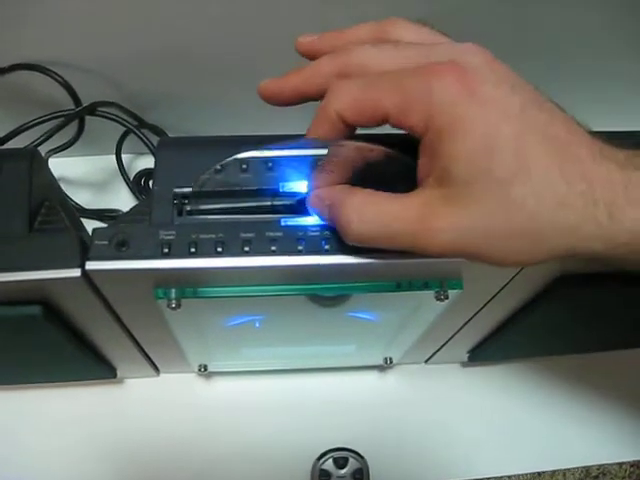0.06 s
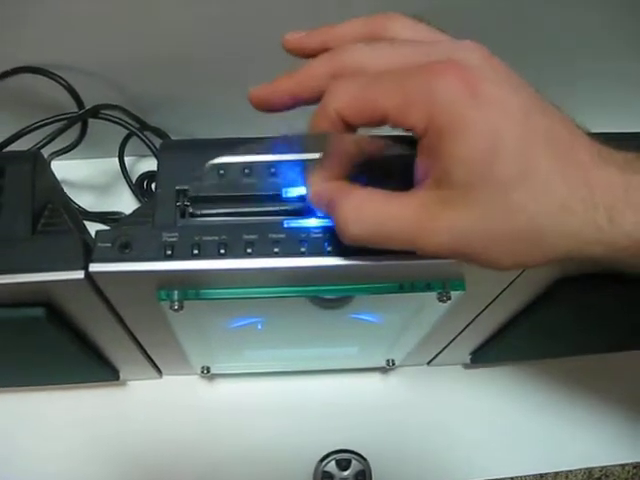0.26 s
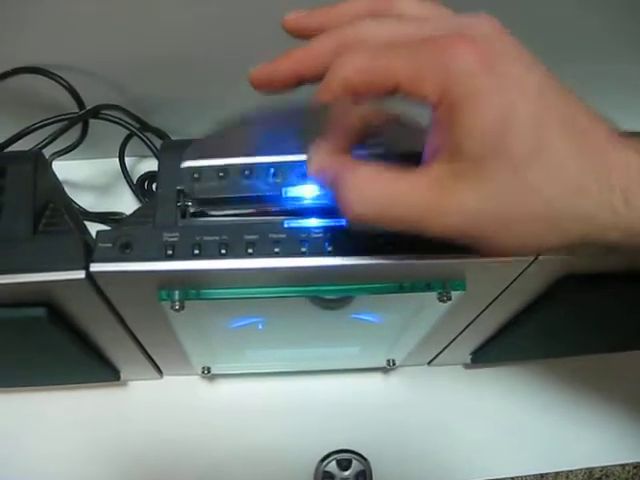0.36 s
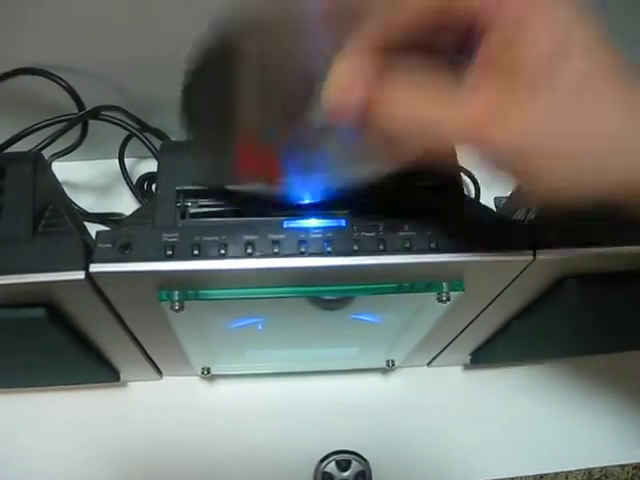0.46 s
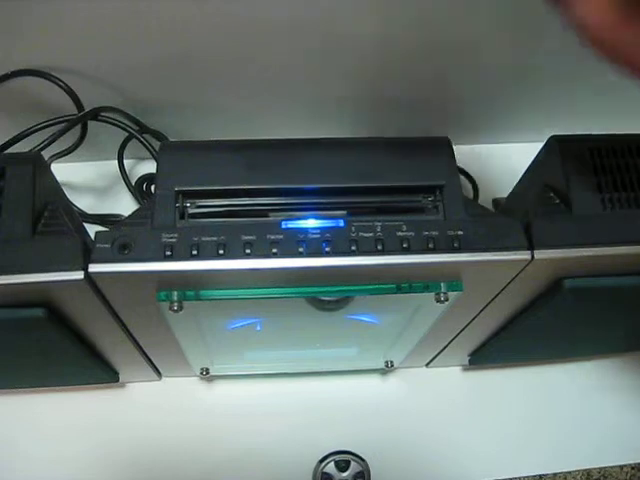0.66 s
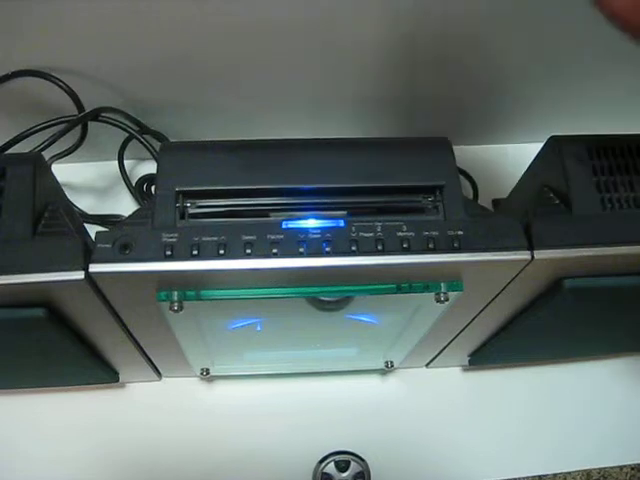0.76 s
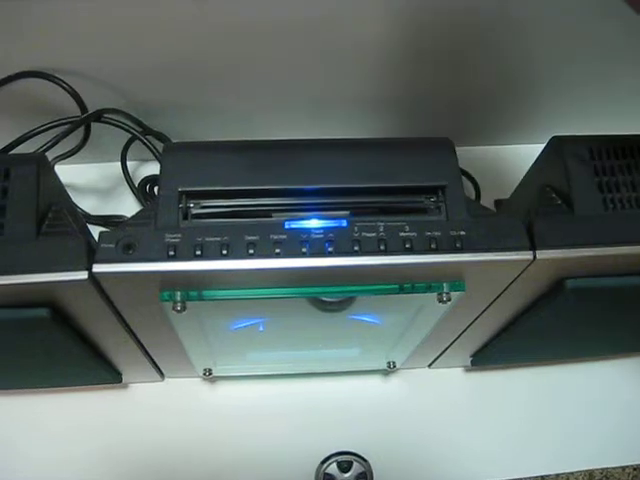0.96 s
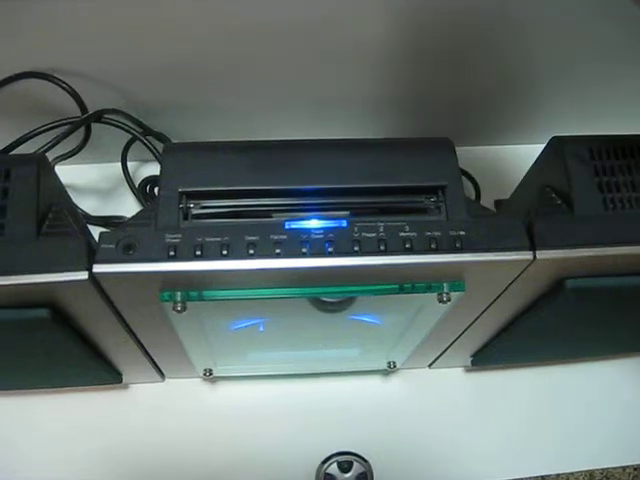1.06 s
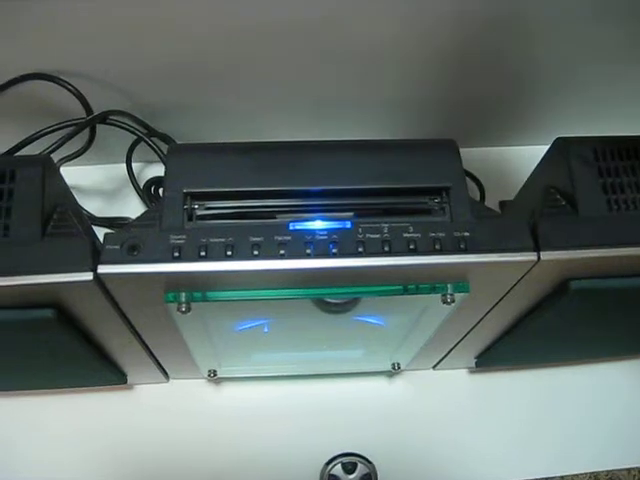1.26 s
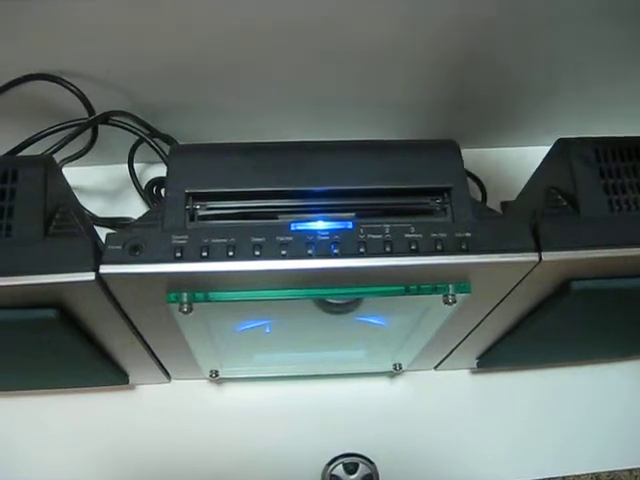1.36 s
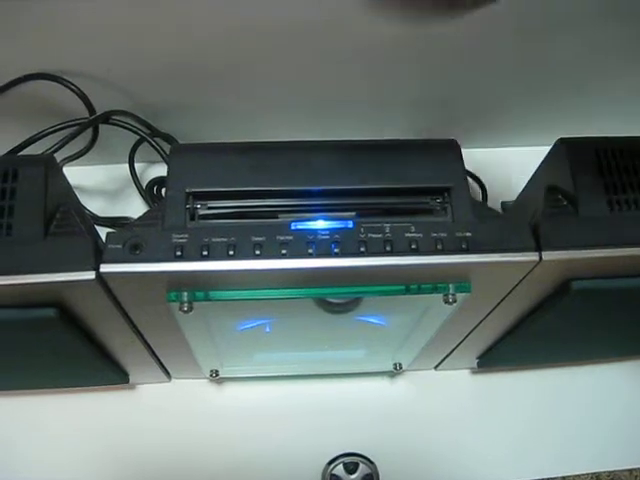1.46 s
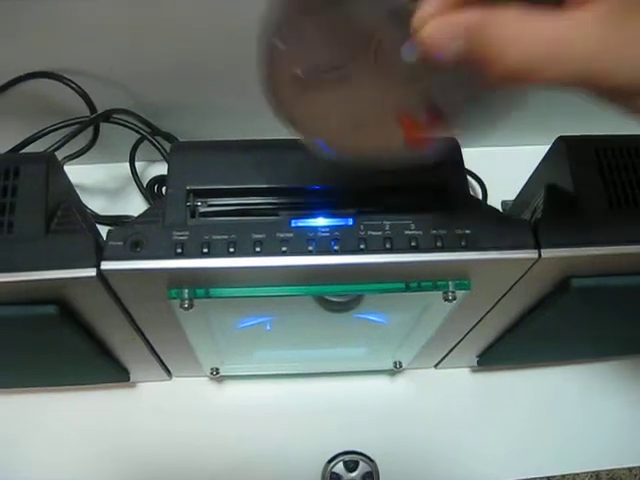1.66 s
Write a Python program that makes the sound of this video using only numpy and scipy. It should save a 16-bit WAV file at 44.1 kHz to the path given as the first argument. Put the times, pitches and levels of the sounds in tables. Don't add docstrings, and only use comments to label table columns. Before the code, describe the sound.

A disc snaps out of a plastic player slot, rattles briefly and scrapes free in a quiet room.

```python
import sys
import numpy as np
from scipy import signal
from scipy.fft import rfft, irfft
from scipy.io import wavfile
from scipy.ndimage import uniform_filter1d

SR = 44100
rng = np.random.default_rng(int(sys.argv[2]) if len(sys.argv) > 2 else 0)


def linear_from_db(decibels):
    return 10 ** (np.asarray(decibels, float) / 20)


def file_out(sig):
    cols = np.atleast_2d(sig).T
    lim = np.clip(cols, -1, 1)
    pcm = np.round(lim * 32767).astype(np.int16)
    wavfile.write(sys.argv[1], SR, pcm)


N = 74970
NOTCH_HZ = 7870


def evened(x):
    return x / np.sqrt(np.mean(x ** 2) + 1e-20)


def read(points, hz):
    point_hz, value = np.transpose(points)
    return np.interp(np.log(hz + 1), np.log(point_hz + 1), value)


def add(mix, start_s, sound):
    part = mix[round(start_s * SR):][:len(sound)]
    part += sound[:len(part)]


def lumps(length_s):
    return evened(uniform_filter1d(rng.standard_normal(N), int(length_s * SR)))


def resonate(x, hz, width_hz):
    r = np.exp(-np.pi * width_hz / SR)
    return 2 * signal.lfilter([1 - r], [1, -r * np.exp(2j * np.pi * hz / SR)], x).real


def ring(drive, hz, width_hz):
    out = resonate(drive, hz, width_hz)
    return 1.8 * out / np.linalg.norm(out)


def rattle(t, length_s):
    contacts_per_s = 6000
    draw = rng.random((2, len(t)))
    contacts = (draw[0] < contacts_per_s / SR) * (2 * draw[1] - 1)
    contacts[0] = 1
    contacts = contacts * linear_from_db(-8 * (t / length_s) ** 5.6)
    return contacts / np.linalg.norm(contacts)


# [pitch_hz, density_db (per Hz)]
HISS_SPECTRUM = [(20, -9.5), (110, -1), (400, -5.5), (1000, -10.5), (2500, -15.5), (6500, -21),
                 (12000, -24.5), (16000, -31)]


def hiss():
    level_db, lump_db, lump_hz, lump_s = -54, 2, 650, .012
    hz = np.fft.rfftfreq(N, 1 / SR)
    spectrum = rfft(rng.standard_normal(N)) * linear_from_db(read(HISS_SPECTRUM, hz))
    low = 1 / np.sqrt(1 + (hz / lump_hz) ** 2)
    murmur = irfft(spectrum * low, N) * evened(linear_from_db(lump_db * lumps(lump_s)))
    return linear_from_db(level_db) * evened(murmur + irfft(spectrum * (1 - low), N))


# [pitch_hz, width_hz, level_db]
DISC_MODES = [(1214, 200, 2), (1740, 300, 9.5), (2200, 505, 9), (2690, 133, 12), (3400, 240, -0.5),
              (3990, 620, 6), (4497, 440, 5), (5560, 390, 5), (6220, 570, 9), (6850, 680, 6),
              (8600, 1150, 7.5), (11180, 1260, 8.5), (13400, 1700, 6), (15100, 1400, 4.5)]


def disc_ring(t, length_s, treble_db, thump_db):
    body_hz, treble_hz, sharp_s = 3000, 7800, .004
    contacts = rattle(t, length_s)
    blow = .7 * contacts + (t == 0) * min(sharp_s / length_s, 1) ** 2
    out = np.zeros(len(t))
    for k, (hz, width_hz, db) in enumerate(DISC_MODES):
        gain_db = db + treble_db * (hz > treble_hz) + thump_db * (hz < body_hz)
        drive = blow if hz < body_hz else contacts
        out += (-1) ** k * linear_from_db(gain_db) * ring(drive, hz, width_hz)
    return out


# [pitch_hz, level_db, t60_s]
CASE_MODES = [(284.4, -10.5, 0.34), (326, -4.5, 0.14), (344.7, -9, 0.37), (394, 1.5, 0.066),
              (600, -10, 0.033), (685, -7.5, 0.066), (760, 0.5, 0.097), (835, -10.5, 0.34), (926, -9.5, .1),
              (1620, -13, 0.23), (1659, -16, 0.12), (1778, -10.5, 0.13), (1904, -8, 0.09)]


def case_ring(t, start_s):
    rise_s, damp_start_s, damp_db_per_s = 0.0035, .285, 350
    modes = np.zeros(len(t))
    for k, (hz, db, t60_s) in enumerate(CASE_MODES):
        modes += (-1) ** k * linear_from_db(db - 60 * t / t60_s) * np.sin(2 * np.pi * hz * t)
    rise = np.sin(np.pi / 2 * np.minimum(t / rise_s, 1)) ** 2
    damping = linear_from_db(-damp_db_per_s * np.maximum(start_s + t - damp_start_s, 0))
    return rise * modes * damping


# [start_s, level_db, rattle_s, treble_db (above notch), thump_db (low modes, case)]
DISC_KNOCKS = [
    (.1996, -9.5, 0.0021, 0, -1.5),
    (.2031, -26.5, .004, 0, 1.5),
    (.2152, -17.5, 0.0046, -3.5, -5),
    (.2190, -25, 0.0015, -24, -2),
    (0.2258, -26.5, 0.0028, -4, 0.5),
    (0.2277, -23, 0.00088, -8, -2.5),
    (0.2307, -32, 0.0028, -6, 0),
    (.2337, -24.5, 0.0052, -11.5, -2),
    (0.238, -32.5, 0.0057, -13, 2),
    (.2640, -39, 0.018, -15, 8),
]


def knocks(hits, case):
    case_db, shove_db, shove_s = -14, -34, 0.0035
    t = np.arange(int(.4 * SR)) / SR
    for start_s, level_db, rattle_s, treble_db, thump_db in DISC_KNOCKS:
        add(hits, start_s, linear_from_db(level_db) * disc_ring(t, rattle_s, treble_db, thump_db))
        add(case, start_s, linear_from_db(level_db + case_db + thump_db) * case_ring(t, start_s))
    add(case, DISC_KNOCKS[0][0], linear_from_db(shove_db) * np.hanning(int(shove_s * SR)))


# [pitch_hz, t60_s]
ROOM_DECAY = [(250, 0.74), (1000, 0.48), (3000, 0.21), (8000, 0.12), (15000, 0.054)]


def room(x):
    level_db = -14.5
    taps = np.zeros(SR // 2)
    at = np.arange(100, len(taps) - 20, 20)
    taps[at + rng.integers(0, 20, len(at))] = rng.choice([-1., 1.], len(at))
    hz, t, z = signal.stft(taps, SR, nperseg=256)
    decay = linear_from_db(-60 * t / read(ROOM_DECAY, hz)[:, None])
    tail = signal.istft(z * decay, SR, nperseg=256)[1]
    return linear_from_db(level_db) * signal.fftconvolve(x, tail / np.linalg.norm(tail))[:N]


# [pitch_hz, width_hz, level_db]
RUB_MODES = [(2170, 57, -4), (2820, 280, -3), (3710, 75, -0.5), (4320, 76, -9), (5060, 120, -5),
             (5800, 69, 0), (7290, 600, 3), (9400, 440, -6), (10160, 400, -1), (11300, 340, 1),
             (12900, 500, -4), (14800, 500, -20)]


def rub(treble_db):
    slips_per_s, slip_spread_db, bed_gain, wide_db, patch_db, patch_s = 2000, 4, 0.82, 2, 3.5, .012
    slips = linear_from_db(slip_spread_db * np.minimum(rng.exponential(1, N), 2))
    slips = slips * (rng.random(N) < slips_per_s / SR)
    which = rng.integers(0, len(RUB_MODES), N)
    bed = rng.standard_normal(N)
    low, high = np.zeros(N), np.zeros(N)
    for k, (hz, width_hz, db) in enumerate(RUB_MODES):
        drive = evened(slips * (which == k)) + bed_gain * bed
        mode = linear_from_db(db) * evened(resonate(drive, hz, width_hz))
        side = low if hz < NOTCH_HZ else high
        side += mode * evened(linear_from_db(patch_db * lumps(patch_s)))
    band_sos = signal.butter(2, [800, NOTCH_HZ], "band", fs=SR, output="sos")
    top_sos = signal.butter(2, NOTCH_HZ, "high", fs=SR, output="sos")
    low = evened(low) + linear_from_db(wide_db) * evened(signal.sosfilt(band_sos, bed))
    high = evened(high) + linear_from_db(wide_db + 1) * evened(signal.sosfilt(top_sos, bed))
    return evened(low) + linear_from_db(treble_db) * evened(high)


# [start_s, level_db, treble_db (share above notch)]
SLIDE_PATH = [
    (0.234, -53, -6),
    (0.248, -41.5, -4),
    (.28, -41, -9.5),
    (.308, -43.5, -8),
    (.335, -38.5, -8.5),
    (.36, -43, -8.5),
    (.392, -43.5, -6),
    (.4, -50.5, -19),
    (.42, -73, -12),
]


def slide():
    t = np.arange(N) / SR
    start_s, level_db, treble_db = np.transpose(SLIDE_PATH)
    return linear_from_db(np.interp(t, start_s, level_db, -120, -120)) * rub(np.interp(t, start_s, treble_db))


# [start_s, pitch_hz, level_db, length_s]
CATCHES = [(0.318, 3700, -46, .01), (.3305, 2820, -39, 0.0057), (.331, 5060, -41, 0.0078),
           (0.348, 2910, -44, 0.0075), (.353, 5800, -45, 0.014), (.355, 2900, -45.5, .008),
           (0.358, 10300, -50, .014), (0.362, 9200, -51, .006), (0.373, 5800, -42, .005),
           (.3784, 5800, -33.5, 0.0061), (.386, 3024, -50, 0.013), (.387, 5800, -53, 0.0081),
           (1.535, 5800, -61, .018)]


def squeaks():
    rise_s = 0.00085
    out = np.zeros(N)
    t = np.arange(1500) / SR
    for start_s, hz, level_db, length_s in CATCHES:
        shape = np.minimum(t / rise_s, 1) * linear_from_db(-12 * (t / length_s) ** 2)
        tone = np.sqrt(2) * np.sin(2 * np.pi * hz * t)
        rough = 0.54 * evened(resonate(rng.standard_normal(len(t)), hz, 300))
        add(out, start_s, linear_from_db(level_db) * shape * (tone + rough))
    return out


def brush():
    start_s, length_s, level_db, treble_db = 1.49, 0.084, -60, 1
    u = np.clip((np.arange(N) / SR - start_s) / length_s, 0, 1)
    return linear_from_db(level_db) * np.sin(np.pi * u) ** .6 * rub(treble_db)


# [start_s, level_db, rattle_s, pitch_hz, push_db]
FAINT_TICKS = [
    (1.548, -60, .002, 1900, -49),
    (1.5855, -47.5, 0.0031, 6900, -67),
    (1.6699, -47.5, 0.00065, 2700, -43),
    (1.6715, -57.5, .01, 3600, -56),
    (1.5475, -61, 0.0022, 370, -43.5),
]


def tick(level_db, rattle_s, hz, push_db):
    wide_db, width_hz, push_hz = -1.5, 350, 756
    t = np.arange(int(.05 * SR)) / SR
    contacts = rattle(t, rattle_s) * np.sqrt(rattle_s * SR)
    tone = ring(contacts, hz, width_hz) * np.sqrt(rattle_s * SR + 30) / 2
    wide = resonate(contacts, 0.35 * hz, 2 * hz)
    push = np.sin(2 * np.pi * push_hz * t) * np.exp(-2.6 * push_hz * t)
    return linear_from_db(level_db) * (tone + linear_from_db(wide_db) * wide) + 2 * linear_from_db(push_db) * push


def scene():
    floor = hiss()
    hits, case = np.zeros(N), np.zeros(N)
    knocks(hits, case)
    moving = slide() + squeaks() + brush()
    for start_s, *settings in FAINT_TICKS:
        add(hits, start_s, tick(*settings))
    return (moving + hits + case + room(hits + .5 * moving) + floor)[None]


def top_cut(x):
    return signal.sosfilt(signal.butter(12, 17080, fs=SR, output="sos"), x)


def low_pass(x, edge_hz):
    taps = signal.firwin(1023, edge_hz, window=("kaiser", 9), fs=SR)
    return signal.oaconvolve(x, taps[None], "same")


def record(dry):
    notch_width_hz, bump_hz, bump_width_hz, bump_gain = 1750, 9200, 520, 0.36
    edge_hz, leak_edge_hz, leak_db, leak_above_db = 15740, 16900, -25, -19
    x = signal.lfilter(*signal.iirnotch(NOTCH_HZ, NOTCH_HZ / notch_width_hz, SR), dry)
    x = x + bump_gain * resonate(x, bump_hz, bump_width_hz)
    band, wide = low_pass(x, edge_hz), low_pass(x, leak_edge_hz)
    is_loud = uniform_filter1d(x ** 2, 128) > linear_from_db(2 * leak_above_db)
    loud = uniform_filter1d(1. * is_loud, 128)
    return top_cut(band + linear_from_db(leak_db) * loud * (wide - band))


dry = scene()
out = record(dry)
file_out(out)
```